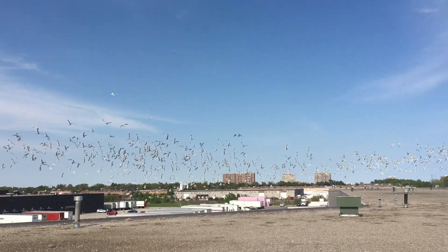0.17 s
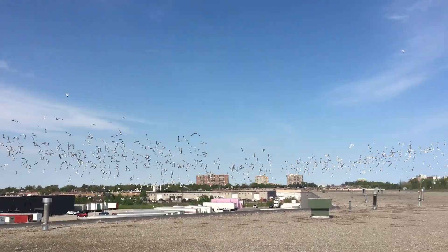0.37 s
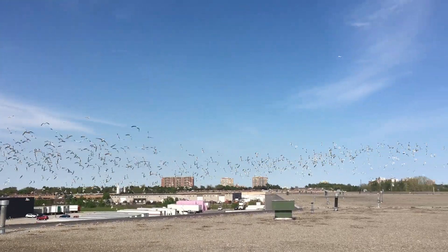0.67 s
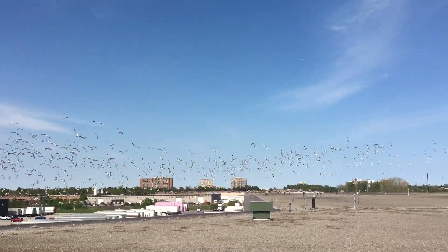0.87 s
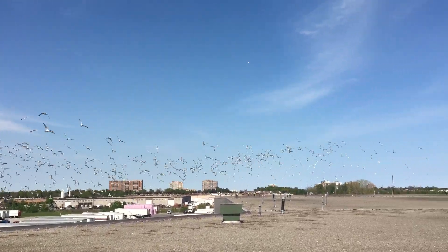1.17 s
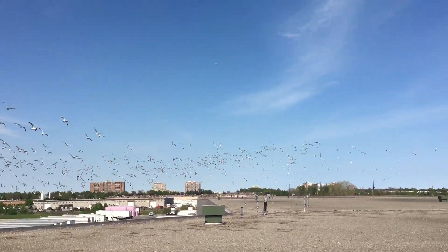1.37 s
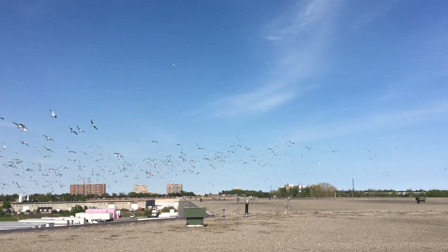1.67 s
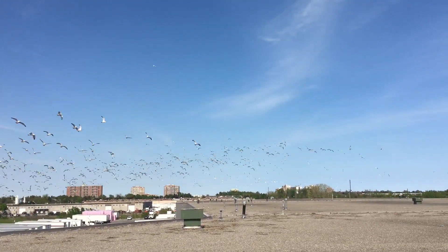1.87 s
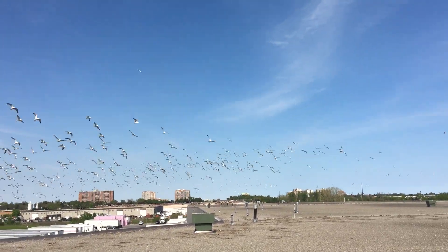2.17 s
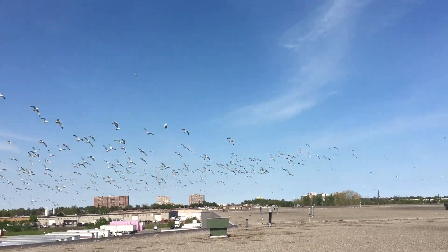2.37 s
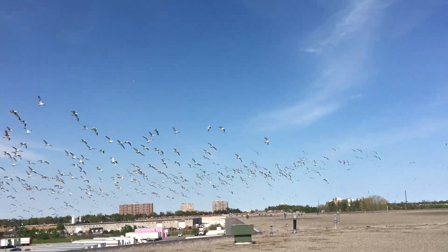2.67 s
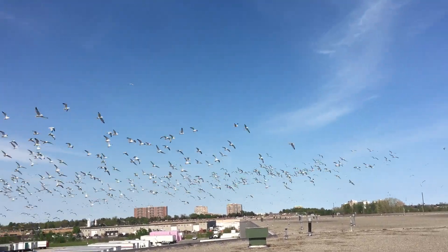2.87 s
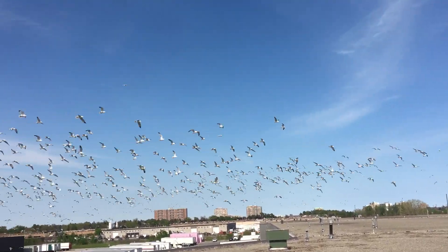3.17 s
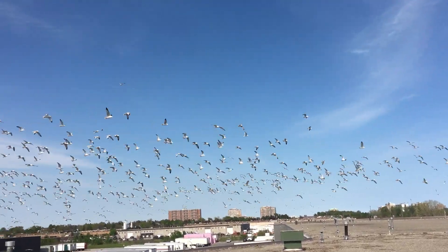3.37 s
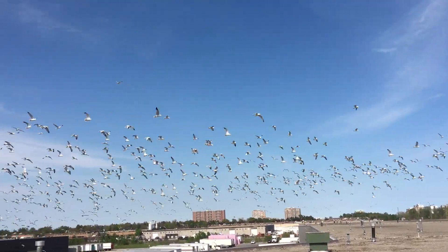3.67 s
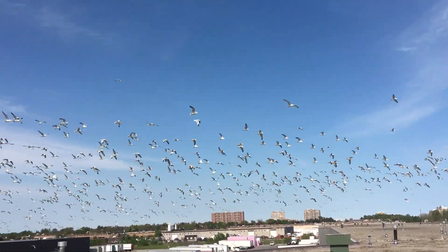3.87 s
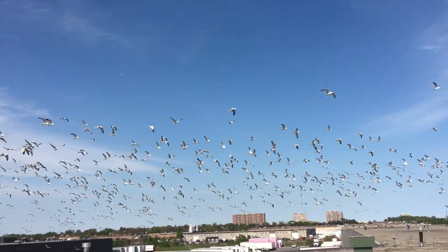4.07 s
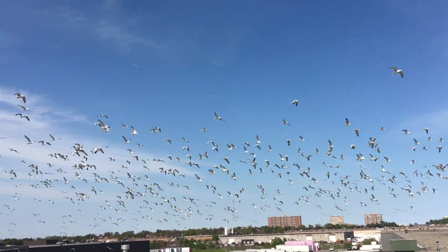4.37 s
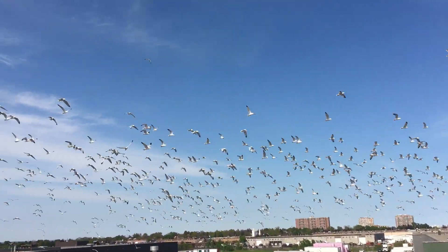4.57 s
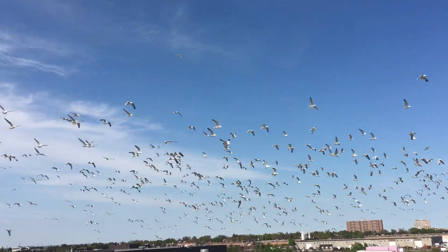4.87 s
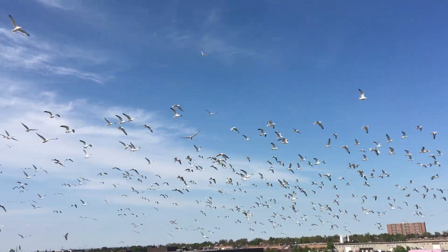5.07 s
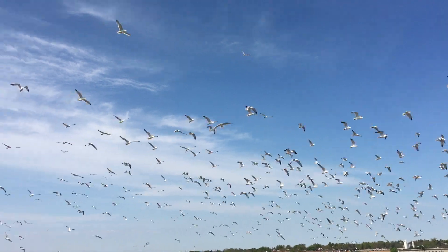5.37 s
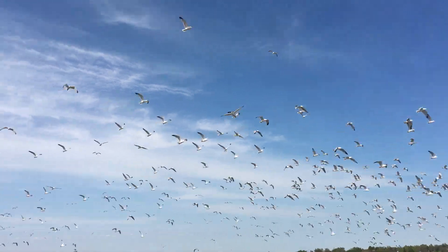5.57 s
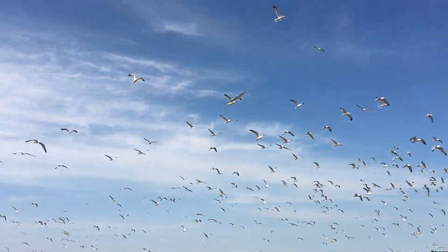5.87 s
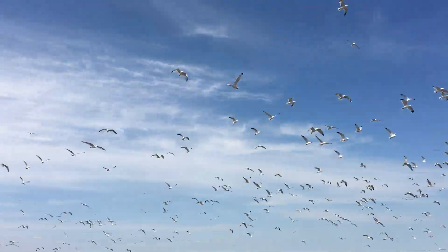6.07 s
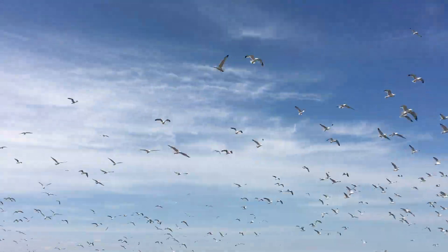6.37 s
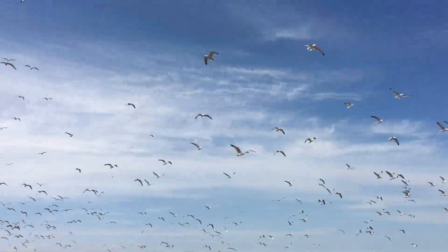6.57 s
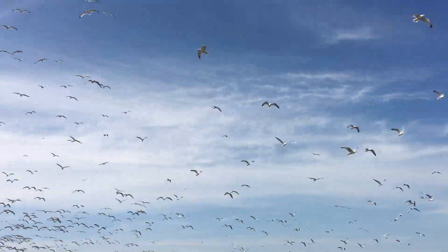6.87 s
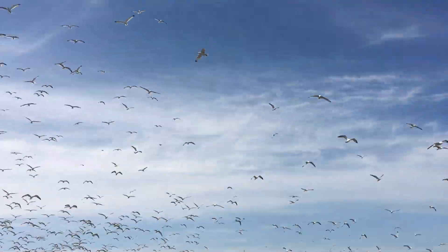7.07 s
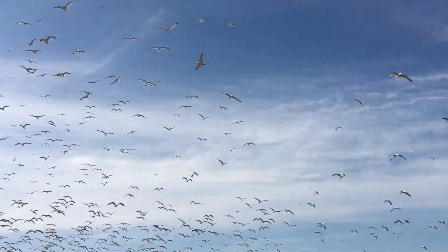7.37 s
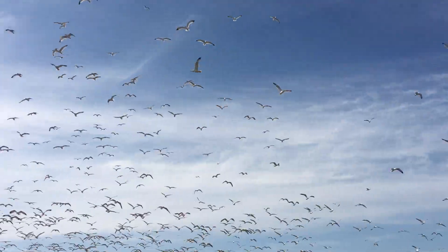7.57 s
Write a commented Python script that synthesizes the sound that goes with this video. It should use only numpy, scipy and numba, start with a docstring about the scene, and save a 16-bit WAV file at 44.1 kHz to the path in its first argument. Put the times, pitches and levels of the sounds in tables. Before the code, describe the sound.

Gulls whistle, mew and yelp, swelling as the flock wheels closer, with low wind thuds and distant traffic.

```python
"""A large flock of gulls rises from a flat roof, heard on a phone in the open.
From the start, near birds cry falling whistles, low mews and short yelps over a distant town.
Gusts buffet the microphone from 0.3 s and die down by about 5 s.
The chorus of farther birds thickens and swells as the flock wheels closer, loudest in the last 2.5 s."""
import sys
import numpy as np
from scipy import signal
from scipy.fft import rfft, irfft, next_fast_len
from scipy.io import wavfile
from scipy.ndimage import uniform_filter1d
from numba import njit

SR = 44100
rng = np.random.default_rng(int(sys.argv[2]) if len(sys.argv) > 2 else 0)


def transcribe(u):
    """Save the signal u as a 16-bit wav file named by the first command-line argument.

    u: samples, shape (n,) or (channels, n), limited to [-1, 1]; the rate is SR.
    q: integer samples, one column per channel.
    """
    v = np.clip(np.atleast_2d(u).T, -1, 1)
    q = np.round(v * 32767).astype(np.int16)
    wavfile.write(sys.argv[1], SR, q)


N = 340011

# near whistles: start_s, length_s, first_hz, last_hz, level_db (before trim), second_re_first_db
WHISTLE_NOTES = [(0.0, 0.034, 2040, 1830, -41, -13), (0.03, 0.11, 2260, 1950, -44.5, -3),
                 (0.245, 0.043, 2730, 2750, -36.5, -26), (0.286, 0.054, 2876, 2520, -34.5, -23),
                 (0.259, 0.078, 2450, 2370, -38.5, -31), (0.326, 0.051, 2830, 2555, -34, -21),
                 (0.388, 0.15, 2410, 2190, -48, -3.5), (0.462, 0.16, 2175, 2007, -45.5, -1),
                 (0.641, 0.073, 2415, 2334, -39, -16), (0.649, 0.05, 2835, 2520, -38, -25),
                 (0.695, 0.13, 2600, 2310, -47.5, -12), (0.819, 0.14, 2173, 2020, -45, -18),
                 (0.837, 0.11, 2605, 2480, -47, -14.5), (1.072, 0.1, 2620, 2360, -44.5, -14),
                 (1.125, 0.1, 2477, 2180, -44, -25), (1.131, 0.074, 2810, 2560, -42, -20),
                 (1.353, 0.21, 2743, 2635, -40.5, -22.5), (1.355, 0.09, 2360, 2340, -45.5, -26),
                 (1.477, 0.074, 2440, 2010, -36, -5.5), (1.508, 0.17, 3060, 2420, -34.5, -33),
                 (1.642, 0.058, 2210, 2070, -58, 10), (1.649, 0.086, 2865, 2640, -38.5, -19),
                 (1.733, 0.09, 2630, 2270, -50, -11), (1.782, 0.16, 2347, 2250, -43, -12),
                 (1.857, 0.091, 2850, 2340, -39.5, -15.5), (2.018, 0.11, 2510, 2360, -36.5, -21),
                 (2.045, 0.06, 3640, 3570, -46, -44), (2.094, 0.15, 2137, 2060, -32, -11.5),
                 (2.095, 0.048, 2730, 2650, -39, -11), (2.151, 0.078, 2690, 2520, -38.5, -26),
                 (2.537, 0.068, 2770, 2575, -36.5, -34), (2.489, 0.17, 2447, 2150, -44, -5.5),
                 (2.586, 0.11, 2730, 2150, -39.5, -20), (2.637, 0.13, 1806, 1758, -44.5, -14),
                 (2.717, 0.058, 2023, 1920, -36, -9), (2.746, 0.11, 2390, 1990, -40.5, 0.5),
                 (2.785, 0.076, 2610, 2480, -35, -20), (2.837, 0.15, 2467, 2270, -42, -3),
                 (2.969, 0.17, 2840, 2320, -42.5, -21), (2.993, 0.062, 2250, 2220, -45, -10),
                 (3.194, 0.21, 2324, 2080, -47.5, 3.5), (3.232, 0.14, 2775, 2710, -42, -36),
                 (3.412, 0.054, 2453, 2450, -37, -27), (3.444, 0.14, 2985, 2420, -37.5, -26),
                 (3.549, 0.038, 3270, 3130, -35, -37), (3.63, 0.061, 3120, 3100, -39, -39),
                 (3.796, 0.1, 3000, 2750, -36, -24), (3.843, 0.073, 2480, 2180, -48, -3),
                 (3.888, 0.072, 2290, 2360, -34.5, -20), (3.89, 0.063, 3450, 3280, -41.5, -35),
                 (3.923, 0.054, 2884, 2640, -32.5, -19), (4.006, 0.1, 2210, 2000, -50, 2.5),
                 (4.129, 0.056, 2310, 2205, -38.5, -2.5), (4.284, 0.058, 3330, 3120, -30.5, -37),
                 (4.333, 0.1, 2423, 2330, -39.5, -7), (4.359, 0.077, 2640, 2558, -40, -22),
                 (4.486, 0.054, 2720, 2474, -30.5, -25.5), (4.517, 0.097, 2300, 2400, -38, -18),
                 (4.606, 0.068, 1893, 1800, -43, -7), (4.629, 0.096, 2280, 2110, -50, 7),
                 (4.669, 0.12, 2784, 2370, -38, -20), (4.749, 0.055, 2816, 2660, -36, -30),
                 (4.752, 0.14, 2244, 2070, -36.5, -22), (4.818, 0.08, 2770, 2835, -39.5, -21.5),
                 (4.884, 0.11, 2925, 2940, -39.5, -36), (4.896, 0.107, 2010, 1900, -35.5, -24),
                 (4.971, 0.11, 2036, 1990, -42.5, 0), (5.117, 0.09, 2551, 2326, -35.5, -25),
                 (5.188, 0.12, 2474, 2207, -39.5, -8), (5.261, 0.056, 2600, 2676, -33.5, -31),
                 (5.289, 0.13, 2796, 2560, -40, -10.5), (5.376, 0.086, 3180, 2720, -25.5, -33),
                 (5.399, 0.15, 2185, 2114, -41, -4), (5.538, 0.17, 2044, 1916, -40.5, -23),
                 (5.622, 0.06, 2375, 2390, -35.5, -18), (5.63, 0.15, 2037, 1950, -37.5, -6),
                 (5.723, 0.14, 2480, 2206, -35, -17), (5.869, 0.079, 2840, 2720, -38.5, -37),
                 (6.035, 0.065, 3000, 2860, -26, -31.5), (6.167, 0.084, 2406, 2365, -36, -17),
                 (6.247, 0.06, 2880, 2533, -36.5, -20), (6.459, 0.12, 2393, 2280, -45, 4),
                 (6.54, 0.053, 3330, 3230, -34.5, -26), (6.557, 0.059, 2255, 2210, -36, -5.5),
                 (6.577, 0.11, 2687, 2540, -29.5, -20), (6.671, 0.22, 2166, 2043, -41.5, -9),
                 (6.712, 0.098, 2910, 2710, -34, -21), (6.718, 0.079, 2310, 2290, -35.5, -14),
                 (6.931, 0.12, 2064, 2070, -42.5, -3.5), (6.982, 0.11, 2760, 2420, -27, -25),
                 (7.173, 0.066, 2560, 2674, -37, -24), (7.228, 0.067, 2410, 2073, -37, 4.5),
                 (7.248, 0.049, 2060, 2096, -32.5, -6), (7.295, 0.15, 2187, 2010, -42, 8.5),
                 (7.442, 0.064, 2880, 2940, -35.5, -33), (7.563, 0.1, 2690, 2670, -34.5, -32),
                 (7.656, 0.071, 2128, 2064, -34, -9)]
# near mews: start_s, length_s, middle_hz, level_db
MEW_NOTES = [(0.327, 0.039, 1330, -46), (0.394, 0.39, 1520, -47), (0.499, 0.22, 1090, -46.5),
             (0.73, 0.17, 1330, -49.5), (0.781, 0.21, 1097, -48.5), (1.79, 0.08, 1244, -39),
             (2.146, 0.14, 1691, -36), (2.326, 0.17, 1630, -45.5), (2.744, 0.064, 1125, -37.5),
             (3.207, 0.045, 1534, -38.5), (3.28, 0.16, 1435, -46), (3.41, 0.039, 1250, -45),
             (3.588, 0.045, 1650, -37), (3.657, 0.14, 1044, -47), (4.27, 0.1, 1073, -36.5),
             (5.256, 0.098, 898, -41.5), (5.515, 0.25, 974, -45.5), (5.857, 0.14, 1390, -41),
             (7.302, 0.095, 1019, -36)]
# near yelps: start_s, length_s, first_hz, middle_hz, last_hz, level_db
YELP_NOTES = [(0.184, 0.036, 1040, 1194, 1160, -35.5), (0.25, 0.049, 1160, 1240, 1300, -45),
              (0.605, 0.035, 955, 987, 1000, -41), (0.985, 0.07, 1156, 1194, 1075, -38.5),
              (1.062, 0.058, 1007, 1170, 1250, -43), (1.34, 0.021, 990, 1075, 1140, -37.5),
              (1.425, 0.031, 1050, 1106, 1160, -36.5), (1.49, 0.019, 1216, 1280, 1280, -40),
              (1.81, 0.036, 1153, 1194, 1220, -34), (2.095, 0.059, 828, 875, 955, -33),
              (4.28, 0.055, 1028, 1108, 1040, -33), (2.375, 0.0406, 1064, 1113, 1160, -42.5),
              (2.42, 0.075, 852, 1068, 960, -41.5), (2.495, 0.048, 1114, 1172, 1116, -36.5),
              (3.736, 0.07, 1078, 1257, 1300, -32), (4.085, 0.027, 1025, 1104, 1140, -38.5),
              (4.255, 0.039, 767, 890, 980, -43), (6.245, 0.14, 1053, 1029, 980, -29),
              (6.935, 0.05, 1068, 1128, 1200, -28)]
# response of throat, beak and air path: freq_hz, gain_db
THROAT_RESPONSE = [(500, -31.5), (1000, -15), (1600, -0.5), (2400, 0.5), (3050, 0.5), (3700, -14),
                   (4350, -5), (5200, -24.5), (6200, -36.5), (8000, -50), (11000, -78)]
# far chorus envelope: time_s, level_db
CHORUS_LEVEL = [(0.0, -45), (0.35, -37.5), (1.12, -45), (1.39, -38), (1.52, -32), (1.89, -43.5),
                (2.02, -33.5), (2.45, -41), (2.7, -33.5), (3.05, -32.5), (3.26, -42), (3.67, -32.5),
                (4.18, -35.5), (4.47, -31), (5.2, -31), (5.41, -26.5), (5.75, -30), (6.1, -25.5),
                (6.42, -28.5), (6.8, -27), (7.2, -28), (7.4, -28.5), (7.71, -26)]
# wind envelope at the microphone: time_s, level_db
GUST_LEVEL = [(0.0, -53), (0.3, -44), (0.4, -33), (1.1, -32.5), (1.97, -42.5), (2.7, -32.5), (3.0, -42.5),
              (3.3, -29.5), (3.95, -50), (4.23, -33.5), (5.24, -44), (7.71, -43)]
# single strong eddies: start_s, peak_db
BUFFET_PEAKS = [(0.374, -26), (0.659, -25), (0.816, -20.5), (1.034, -15.5), (1.144, -21), (1.229, -17),
                (1.297, -25), (1.513, -21.5), (2.438, -21), (2.537, -21), (2.701, -15.5), (2.898, -16),
                (3.142, -20), (3.397, -17.5), (3.711, -25), (4.19, -22), (4.294, -18.5), (4.511, -29),
                (4.589, -20.5), (4.876, -18.5)]
# wind noise colour: freq_hz, relative_db
WIND_SPECTRUM = [(12, -46), (30, -6.5), (86, -1.5), (185, -14.5), (245, -22.5), (280, -31.5), (321, -39),
                 (500, -53), (650, -61), (1100, -120)]
# town noise colour: freq_hz, relative_db
TOWN_SPECTRUM = [(25, -49.5), (45, -13), (100, -5.5), (250, -7.5), (500, -16.5), (900, -13.5),
                 (1500, -16.5), (3000, -42), (5500, -64.5), (9000, -57.5), (15700, -85)]


def near_gulls():
    """Birds close enough to follow one by one: four kinds of cry in three voices."""
    clear = syrinx(jitter=.0015, flutter_db=1.5, rasp=.04, drift=.006)
    husky = syrinx(jitter=.003, flutter_db=1.5, rasp=.12, drift=.004)
    raspy = syrinx(jitter=.009, flutter_db=2.5, rasp=.5, drift=.008)
    return whistles(clear) + mews(husky) + yelps(husky) + lead_rasps(raspy)


def whistles(voice, fall_by_middle=.55, trim_db=2.5):
    """High, mostly falling notes. A wider beak strengthens the second partial and those above."""
    out = np.zeros(N)
    for note, seed in zip(WHISTLE_NOTES, rng.random(len(WHISTLE_NOTES))):
        start_s, length_s, first_hz, last_hz, level_db, second_db = note
        middle_hz = first_hz + fall_by_middle * (last_hz - first_hz)
        pitch_hz = np.array([first_hz, middle_hz, last_hz])
        upper_db = level_db + second_db - response_db(THROAT_RESPONSE, 2 * middle_hz)
        gain_db = np.full(len(harmonics_hz(first_hz)), upper_db)
        gain_db[0] = level_db - response_db(THROAT_RESPONSE, middle_hz)
        amps = throat(pitch_hz, gain_db + trim_db)
        add_note(out, start_s, length_s, pitch_hz, *amps, *voice, seed, attack_s=.0025, fade_share=.4)
    return out


def mews(voice, arch=.03):
    """Low held notes, slightly arched, relaxing towards the voice's resting pitch."""
    bow = np.array([1 - arch, 1, 1 - arch])
    notes = [(start_s, length_s, *bow * glide(middle_hz, length_s, goal_hz=980, tau_s=.45), level_db)
             for start_s, length_s, middle_hz, level_db in MEW_NOTES]
    return low_cries(notes, voice, treble_db=-2, fade_share=.3)


def yelps(voice):
    """Short low notes; most climb or arch over."""
    return low_cries(YELP_NOTES, voice, treble_db=-5, fade_share=.2)


def lead_rasps(voice, length_s=.03, gain_db=-5.5, break_ratio=2.3):
    """Throaty rasp just before the voice breaks up into each whistle."""
    notes = []
    for whistle_s, _, whistle_hz, _, level_db, _ in WHISTLE_NOTES:
        pitch_hz = glide(whistle_hz / break_ratio, length_s, goal_hz=1440, tau_s=.081)
        notes.append((whistle_s - length_s, length_s, *pitch_hz, level_db + gain_db))
    return low_cries(notes, voice, treble_db=-5, fade_share=.2)


def low_cries(notes, voice, treble_db, fade_share, treble_hz=3600):
    """Harmonic-rich notes, levelled by their strongest partial, then cut in the treble."""
    out = np.zeros(N)
    for (start_s, length_s, *pitch_hz, level_db), seed in zip(notes, rng.random(len(notes))):
        pitch_hz = np.array(pitch_hz, float)
        partial_hz = harmonics_hz(pitch_hz[1])
        gain_db = level_db - response_db(THROAT_RESPONSE, partial_hz).max()
        amps = throat(pitch_hz, gain_db + treble_db * (partial_hz > treble_hz))
        add_note(out, start_s, length_s, pitch_hz, *amps, *voice, seed, .0025, fade_share)
    return out


def syrinx(jitter, flutter_db, rasp, drift):
    """Unsteady voice: pitch factor (jitter, slow drift) and amplitude factor (flutter, fast rasp)."""
    wobble = 1 + jitter * wander(200) + drift * wander(25)
    flutter = undb(flutter_db * wander(60)) * (1 + rasp * wander(900))
    return wobble, flutter


def throat(pitch_hz, gain_db):
    """Harmonic amplitudes at a note's start and end, coloured by the throat."""
    k = np.arange(1, len(gain_db) + 1)
    return [np.sqrt(2) * undb(gain_db + response_db(THROAT_RESPONSE, k * hz))
            for hz in (pitch_hz[0], pitch_hz[-1])]


def glide(middle_hz, length_s, goal_hz, tau_s):
    """First, middle and last pitch of an exponential approach to goal_hz."""
    return goal_hz + (middle_hz - goal_hz) * np.exp(np.array([.5, 0, -.5]) * length_s / tau_s)


def harmonics_hz(pitch_hz, top_hz=11000):
    """Harmonics that carry through the air."""
    return pitch_hz * np.arange(1, int(top_hz / pitch_hz) + 1)


@njit
def add_note(out, start_s, length_s, pitch_hz, first_amp, last_amp, wobble, flutter, seed,
             attack_s, fade_share):
    """Add one cry: harmonics on a parabola through three pitches, amplitudes sliding first to last."""
    first_hz, middle_hz, last_hz = pitch_hz
    onset, phase = int(start_s * SR), 0.
    for i in range(max(onset, 0), min(int((start_s + length_s) * SR), N)):
        u = (i / SR - start_s) / length_s
        j = i - onset + int(seed * N) // 2  # own stretch of wobble and flutter
        hz = first_hz * (1 - u) * (1 - 2 * u) + 4 * middle_hz * u * (1 - u) + last_hz * u * (2 * u - 1)
        phase += 2 * np.pi * hz * wobble[j] / SR
        two_cos, below, harmonic, total = 2 * np.cos(phase), 0., np.sin(phase), 0.
        for k in range(len(first_amp)):
            total += harmonic * (first_amp[k] + u * (last_amp[k] - first_amp[k]))
            below, harmonic = harmonic, two_cos * harmonic - below  # sine recurrence
        envelope = max(min(u * length_s / attack_s, (1 - u) / fade_share, 1.), 0.)
        out[i] += total * flutter[j] * envelope


def far_gulls(count=700, crowding=.7, preroll_s=.6, break_ratio=2.3, mew_ratio=1.4, mew_share=.17,
              spread_db=2, beak_db=3, air_db_per_khz=-1):
    """Hundreds of cries, dulled by distance: a raspy yelp, then a falling whistle or mew."""
    out = np.zeros(N)
    clear = syrinx(jitter=.004, flutter_db=3, rasp=.14, drift=.007)
    raspy = syrinx(jitter=.009, flutter_db=3, rasp=.4, drift=.008)
    uniform, normal = rng.random((count, 5)), rng.standard_normal((count, 5))
    for k in range(count):
        when, lead, span, seed, kind = uniform[k]
        pitch, climb, drop, loudness, beak = normal[k]
        # denser as more birds take off
        start_s = ((k + when) / count) ** crowding * (N / SR + preroll_s) - preroll_s
        yelp_s, call_s = .025 + .05 * lead, .04945 + .13 * span
        rise, fall = .0306 + .038 * climb, .12 + .05 * drop
        low_hz = 980 * np.exp(.2 * pitch)
        high_hz = low_hz * (mew_ratio if kind < mew_share else break_ratio)
        yelp = (start_s, yelp_s, low_hz * np.array([1 - rise, 1, 1]), -4, raspy, .15)
        call = (start_s + yelp_s, call_s, high_hz * np.array([1, 1 - .61 * fall, 1 - fall]), 0, clear, .5)
        for onset_s, length_s, pitch_hz, note_db, voice, fade_share in (yelp, call):
            air_db = air_db_per_khz * harmonics_hz(pitch_hz[1]) / 1000
            gain_db = note_db + spread_db * min(loudness, .5) + air_db
            gain_db[1:] += beak_db * beak
            amps = throat(pitch_hz, gain_db)
            add_note(out, onset_s, length_s, pitch_hz, *amps, *voice, seed, .014, fade_share)
    running_rms = np.sqrt(uniform_filter1d(out ** 2, SR))
    return undb(envelope_db(CHORUS_LEVEL)) * out / running_rms


def roof_scatter(cries, t60_s=.25, build_s=.0018, wet_db=-12):
    """Gravel roof and walls scatter the cries into a short blur."""
    t = np.arange(int(t60_s * SR)) / SR
    tail = rng.standard_normal(SR)[:len(t)] * undb(-60 * t / t60_s) * np.minimum(t / build_s, 1)
    tail /= np.sqrt(np.sum(tail ** 2))
    return undb(wet_db) * signal.fftconvolve(cries, tail)[:N]


def wind(eddy_db=2, eddy_hz=18, buffet_s=.014, crest_db=9):
    """Eddies thud on the microphone port; the strongest swell briefly over the gust."""
    t = np.arange(N) / SR
    rms = undb(envelope_db(GUST_LEVEL) + eddy_db * wander(eddy_hz))
    for start_s, peak_db in BUFFET_PEAKS:
        window = slice(max(int((start_s - .05) * SR), 0), int((start_s + .1) * SR))
        swell = np.exp(-.5 * ((t[window] - start_s - buffet_s) / buffet_s) ** 2)
        rms[window] += undb(peak_db - crest_db) * swell
    return rms * coloured_noise(WIND_SPECTRUM)


def town(level_db=-42, sway_db=1.1, sway_hz=2.2):
    """Distant traffic and roof fans, nearly steady."""
    return undb(level_db + sway_db * wander(sway_hz)) * coloured_noise(TOWN_SPECTRUM)


def coloured_noise(spectrum):
    """Noise with the given spectrum, rms 1."""
    size = next_fast_len(N)
    gain = undb(response_db(spectrum, np.fft.rfftfreq(size, 1 / SR)))
    return unit_rms(irfft(rfft(rng.standard_normal(size)) * gain, size)[:N])


def wander(rate_hz):
    """Random steps, smoothed twice, rms 1."""
    hold = int(SR / rate_hz)
    steps = np.repeat(rng.standard_normal(N // hold + 1), hold)
    return unit_rms(uniform_filter1d(uniform_filter1d(steps, hold), hold)[:N])


def response_db(spectrum, hz):
    """Spectrum table interpolated over log frequency."""
    freq_hz, gain_db = np.transpose(spectrum)
    return np.interp(np.log(np.maximum(hz, 1)), np.log(freq_hz), gain_db)


def envelope_db(table):
    """Level table interpolated to every sample."""
    return np.interp(np.arange(N) / SR, *np.transpose(table))


def undb(db):
    return 10 ** (np.asarray(db) / 20)


def unit_rms(x):
    return x / np.sqrt(np.mean(x ** 2))


def scene():
    """Mono mix. Far birds skim the roof, so more of their sound arrives scattered."""
    near, far = near_gulls(), far_gulls()
    scattered = roof_scatter(far + undb(-3.5) * near)
    return (near + far + scattered + wind() + town())[None]


def record(dry, hiss_db=-82, low_cut_hz=41, high_cut_hz=15700):
    """The phone adds faint hiss, drops the deepest bass and cuts the very top."""
    hiss = undb(hiss_db) * rng.standard_normal(dry.shape)
    highpass = signal.butter(4, low_cut_hz, "high", fs=SR, output="sos")
    lowpass = signal.ellip(8, .2, 70, high_cut_hz, fs=SR, output="sos")
    return signal.sosfilt(lowpass, signal.sosfilt(highpass, dry + hiss))


dry = scene()
out = record(dry)
transcribe(out)
```